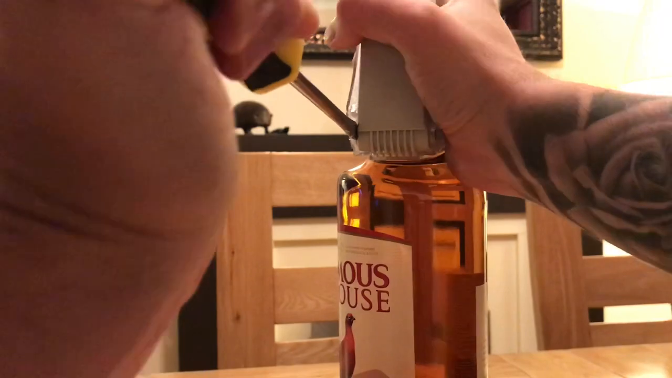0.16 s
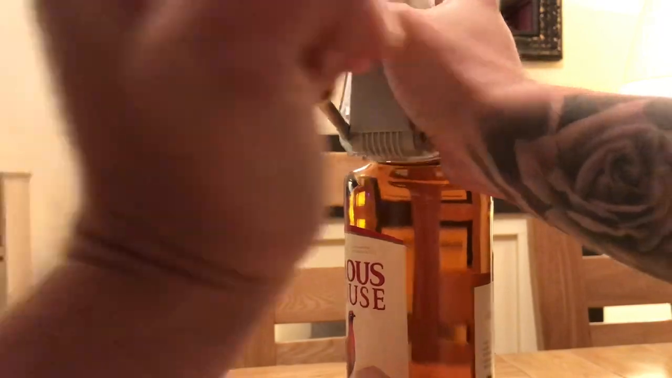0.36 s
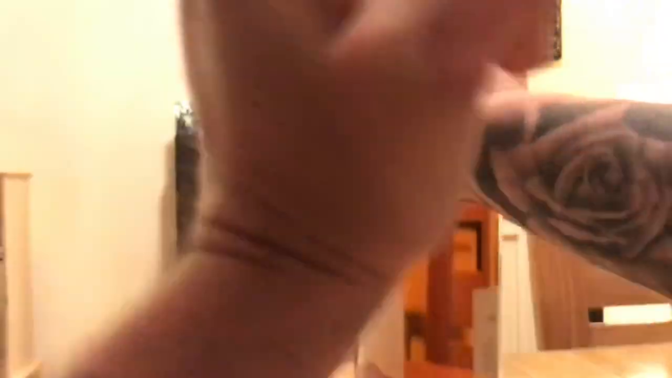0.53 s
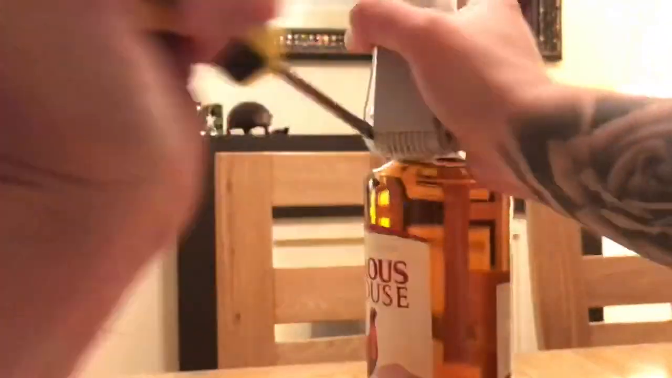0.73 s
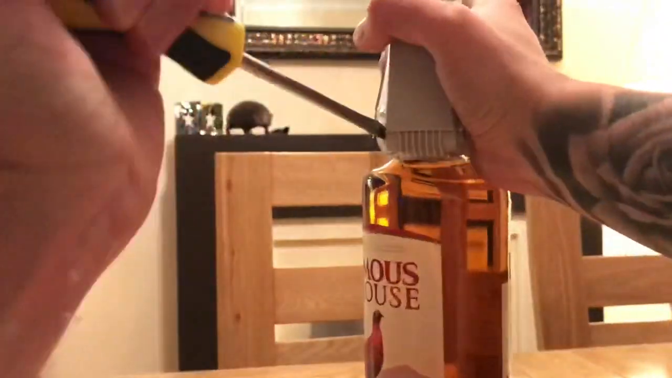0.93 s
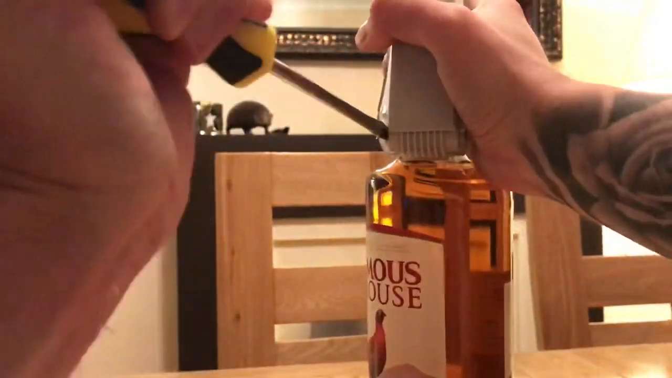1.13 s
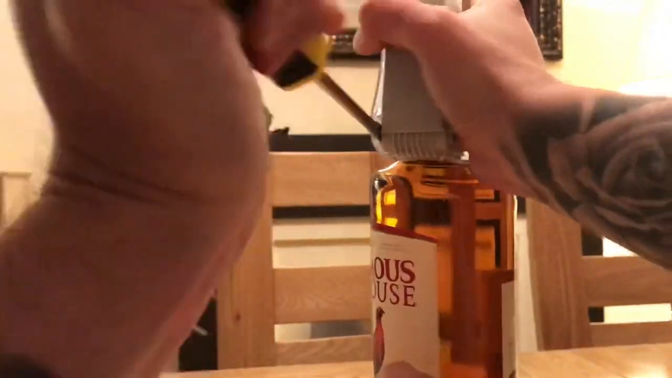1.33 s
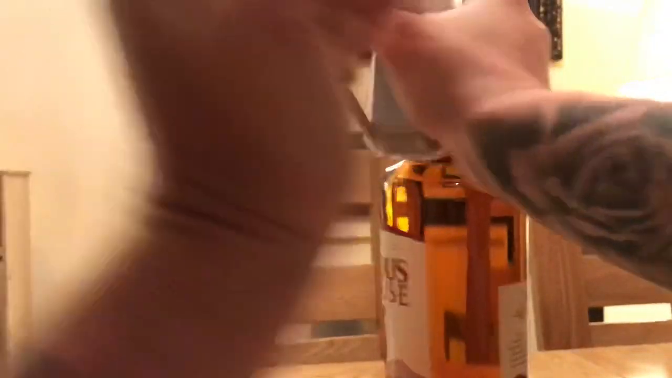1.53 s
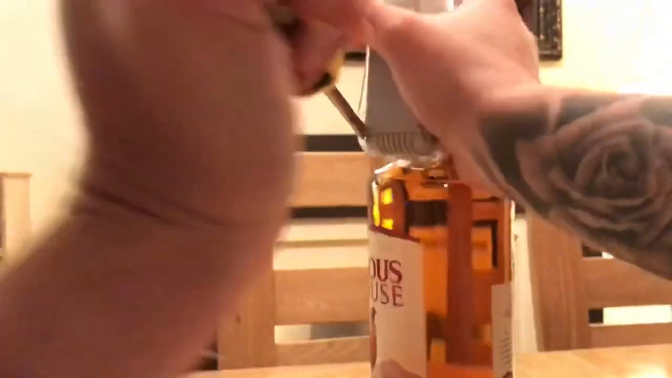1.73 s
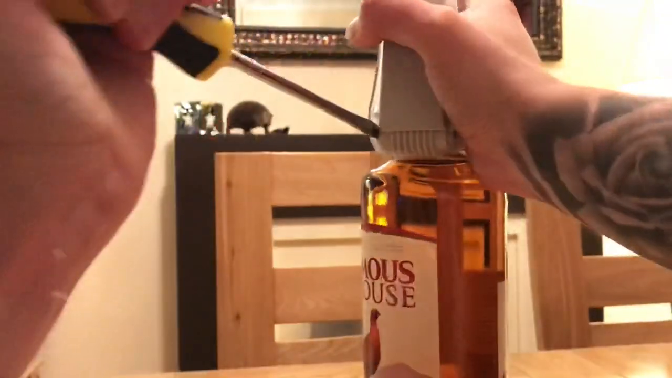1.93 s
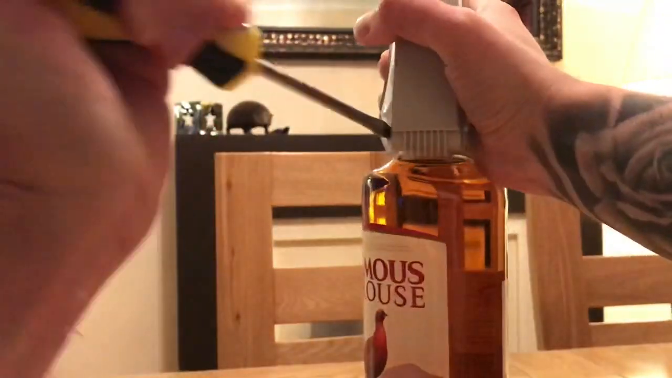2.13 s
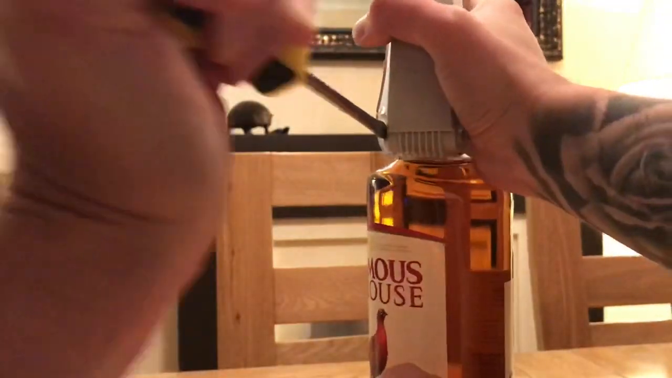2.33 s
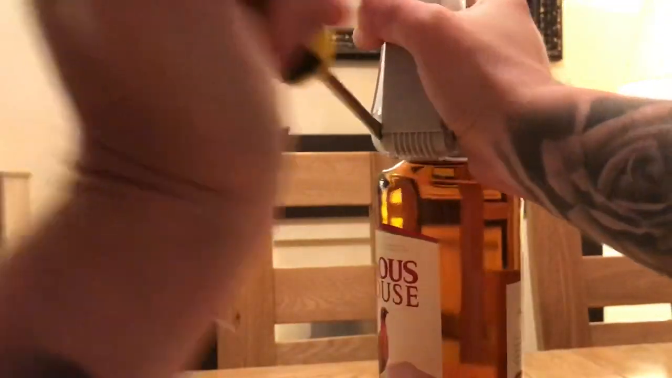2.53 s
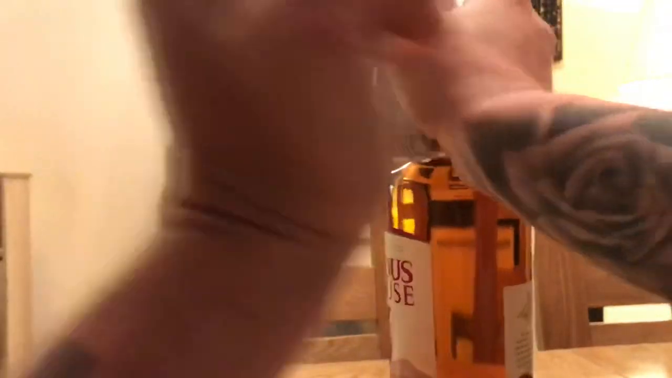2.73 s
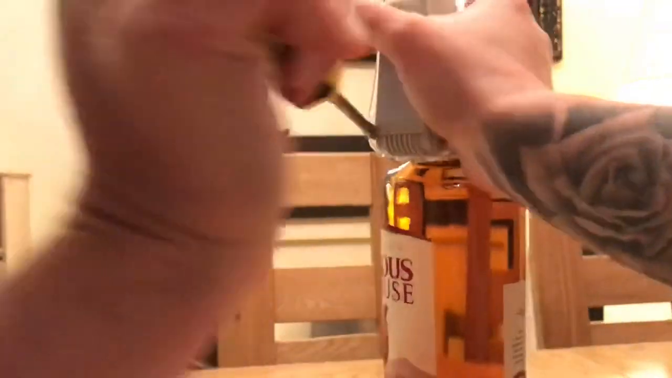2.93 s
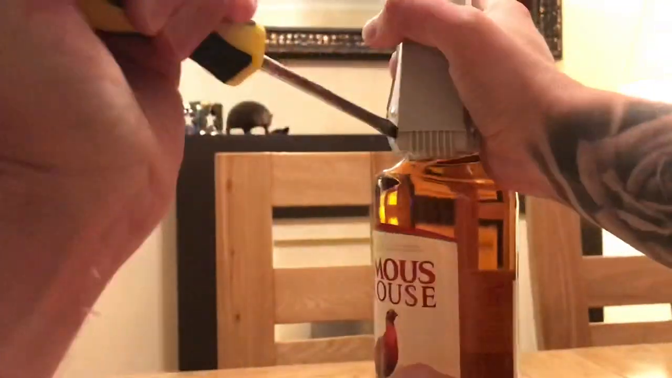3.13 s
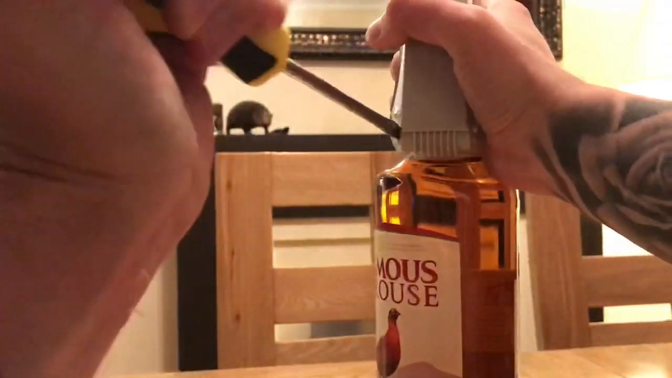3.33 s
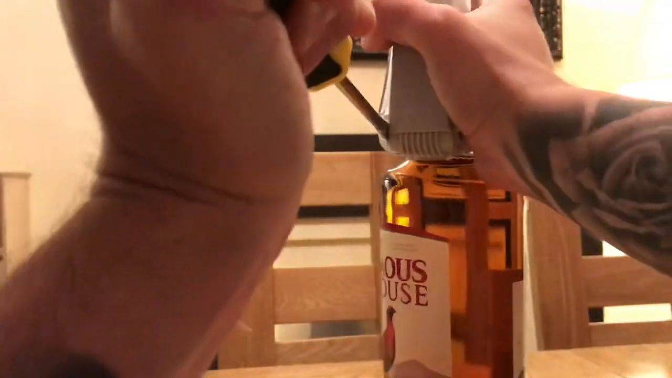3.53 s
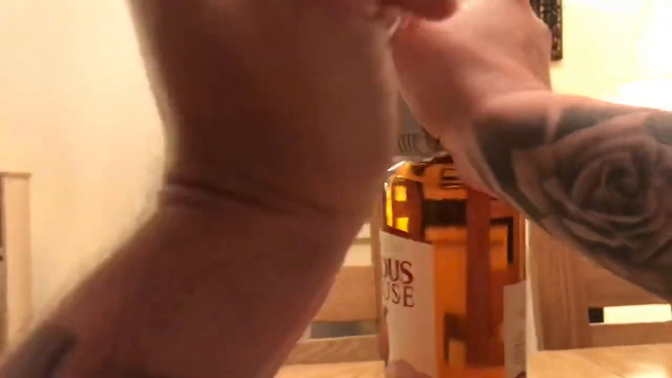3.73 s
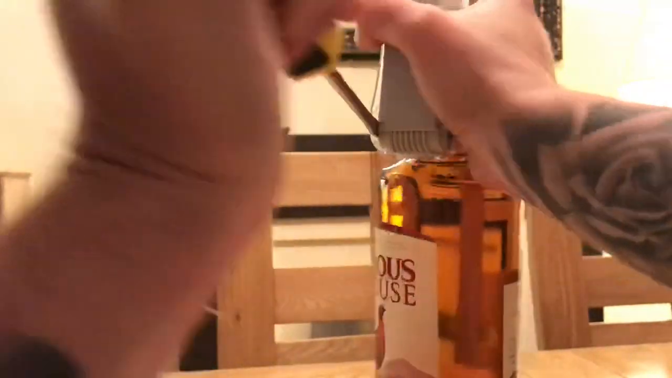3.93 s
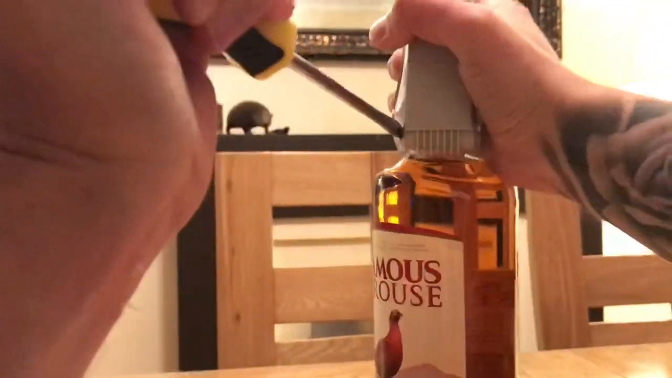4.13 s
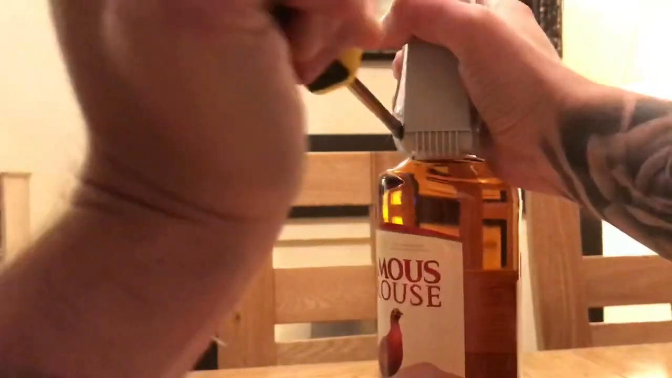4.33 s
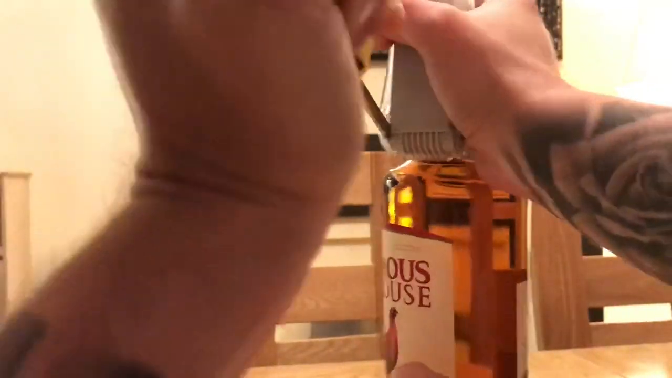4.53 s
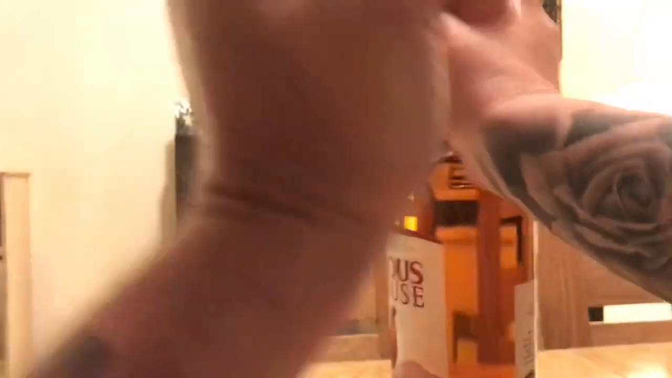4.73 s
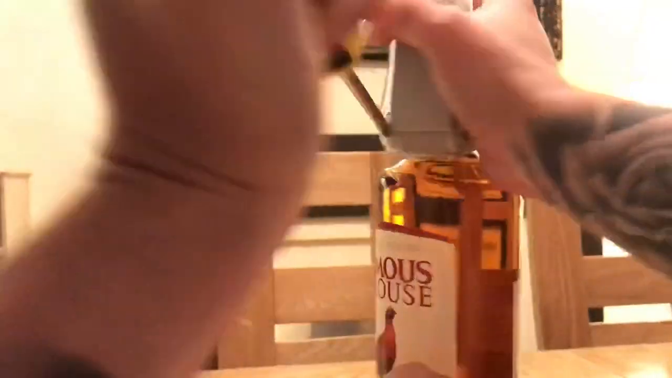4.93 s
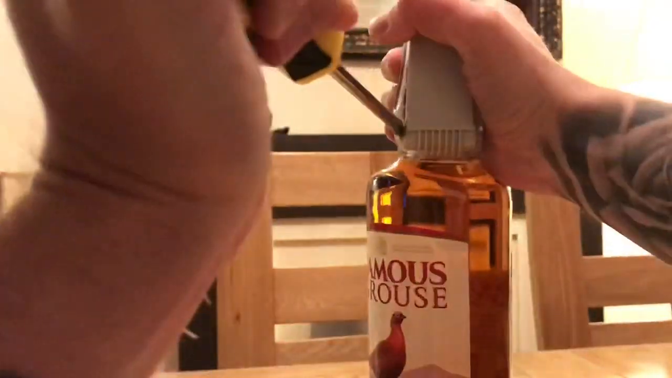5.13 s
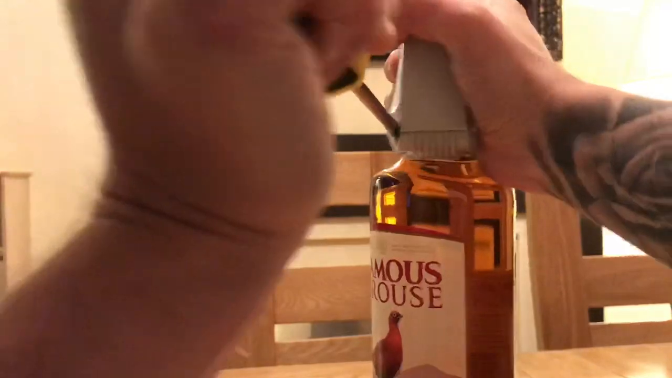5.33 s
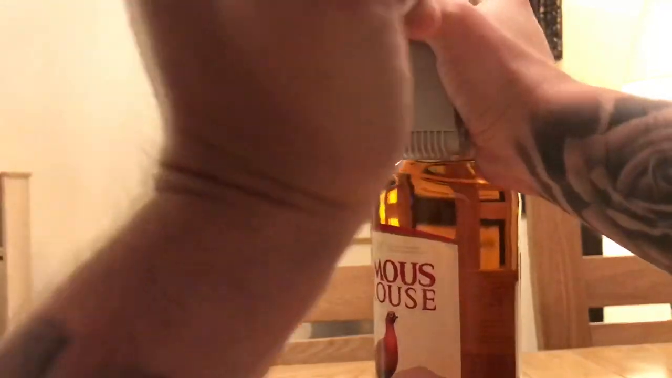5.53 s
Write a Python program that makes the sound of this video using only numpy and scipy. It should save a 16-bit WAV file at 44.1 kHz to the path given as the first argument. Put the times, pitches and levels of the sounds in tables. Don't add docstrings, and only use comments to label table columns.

```python
import sys
import numpy as np
from scipy import signal
from scipy.fft import rfft, irfft
from scipy.io import wavfile
from scipy.ndimage import uniform_filter1d

SR = 44100
rng = np.random.default_rng(int(sys.argv[2]) if len(sys.argv) > 2 else 0)


def linear_from_db(decibels):
    return 10 ** (np.asarray(decibels, float) / 20)


def unload_audio(sound):
    columns = np.transpose(np.atleast_2d(sound))
    steps = np.round(np.clip(columns, -1, 1) * 32767)
    wavfile.write(sys.argv[1], SR, steps.astype(np.int16))


N = 250047

# (frequency [Hz], level [dB])
FLOOR_SPECTRUM = [(25, -25), (120, -3), (212, -12.5), (309, -10), (624, -22), (2000, -29), (10400, -40.5),
                  (15500, -37.5)]
# (frequency [Hz], time to fall 60 dB [s])
ROOM_T60 = [(150, 0.85), (500, 0.35), (1500, 0.31), (4000, 0.31), (8000, .28), (14000, 0.19)]
# (frequency [Hz], level [dB])
ROOM_COLOUR = [(100, -15), (400, 10), (900, -1), (2100, -2.5), (3200, -2.5), (6000, -3), (10000, -4),
               (16000, -3.5)]

TABLE_LOW_MODES = [(73.5, -20, 0.11), (117, -1.5, 0.06), (124.04, 5.5, 0.25), (150.8, 2.5, 0.17),
                   (181.2, -0.5, 0.23), (212.2, -1.5, .25)]
TABLE_UPPER_MODES = [(278.4, 2.2, 0.19), (319.2, 3.5, .17), (369.3, 5.5, 0.074), (392.5, 2, 0.088),
                     (487.6, 1.5, 0.21), (516, -6, 0.6), (601, 1.5, 0.14), (633, -5.5, 0.38),
                     (699, -3.5, 0.5), (972, -3, 0.18)]
GRAIN_MODES = [(554, -0.5, 0.11), (625, 0, 0.1), (706, -4.5, .07), (697.3, -5.5, 0.23), (920, -3.5, 0.035),
               (1098, -5.5, .035), (1300, -2.5, 0.025), (1900, -15, 0.012)]
BOTTLE_MODES = [(1232, -55.5, 1.1), (1303, -56.5, 0.68)]
STRAIN_MODES = [(623, 8, 0.06), (790, 14.5, 0.054), (1250, -0.5, 0.024), (2300, -11, 0.023)]
SHELL_MODES = [(1340, -19, 0.011), (1330, -4, 0.01), (1650, 1.5, 0.023), (1704, -9, 0.078)]
MIDDLE_MODES = [(2592, -29, 0.056), (2713, 7, 0.0076), (3221, -1.5, 0.042), (3270, 5, 0.017),
                (3500, 0.5, 0.0091), (4050, -15, 0.02), (4400, -2, 0.022), (5070, -16, 0.013)]
THIN_MODES = [(6300, 11.5, 0.013), (6720, 3, .011), (7590, 0, 0.039), (8130, 4.5, 0.0052),
              (10200, -10, 0.0038), (11600, -16, 0.0044), (11900, -9, 0.0017), (13800, 5, .005)]

# (time [s], pressure [dB])
HANDLING = [(0.0, -57.5), (0.85, -46.5), (0.95, -68.5), (1.3, -55.5), (1.53, -51.5), (1.66, -39),
            (2.0, -61), (2.18, -54.5), (2.7, -61.5), (2.87, -54), (3.4, -72.5), (4.14, -47.5), (4.5, -50.5),
            (4.91, -49), (5.43, -64.5), (5.67, -60)]
# (time [s], level [dB], frequency [Hz], time to fall 60 dB [s])
THUMPS = [
    (0.452, -30, 67, 0.22),
    (1.472, -51.5, 45, .15),
    (2.652, -35.5, 48.7, 0.13),
    (3.61, -39, 44.8, 0.2),
    (4.616, -39, 45, 0.2),
]
# (time [s], level [dB])
JOLTS = [
    (0.297, -32.5),
    (1.471, -15.5),
    (2.655, -16),
    (3.608, -17),
    (4.612, -15.5),
]
# (time [s], upper modes [dB], low modes [dB], grain rattle [dB])
LANDINGS = [(.171, -32, -33.5, -55), (.633, -7.5, -7, -15.5), (.934, -26, -22, -43),
            (1.681, -14, -10.5, -28.5), (1.728, -31.5, -54, -57), (1.773, -29, -42.5, -40.5),
            (2.875, -16, -12.5, -27.5), (2.918, -19.5, -16.5, -35), (3.04, -29.5, -26, -45.5),
            (3.059, -42.5, -59, -51.5), (3.161, -36, -42.5, -46), (3.999, -24, -26.5, -42.5),
            (4.014, -34, -26, -51), (4.046, -23, -18, -35.5), (4.157, -58.5, -53, -52.5),
            (4.925, -35.5, -26, -34), (4.975, -24, -23.5, -46), (5.066, -35, -23, -43.5)]
# (time [s], upper modes [dB], low modes [dB])
ROCKS = [(0.418, -37.5, -42), (.447, -52, -33.5), (0.595, -34.5, -46), (0.96, -45, -32.5),
         (1.138, -36.5, -52), (1.229, -42, -33), (1.318, -57.5, -42.5), (1.97, -42, -40.5),
         (2.428, -57, -53.5), (2.476, -61.5, -52.5), (3.35, -47, -57), (3.378, -37.5, -30.5),
         (4.298, -40, -44.5), (4.372, -50, -46.5), (4.433, -39, -40), (5.279, -45, -48),
         (5.433, -59.5, -47.5)]

# (time [s], level [dB], tilt [dB per octave], length [ms])
SCRAPES = [
    (0.787, -46, -13, 12.3),
    (1.176, -68, 3, 8.3),
    (4.342, -55, -2, 22),
    (4.398, -49.5, 1.3, 17),
    (5.146, -54, -4.5, 12),
    (5.214, -48.5, -1.5, 28),
    (5.284, -48, 4, 74),
]
# (time [s], level [dB], length [ms])
STRAIN = [
    (1.459, -29, 10.5),
    (2.018, -52, 4.5),
    (2.635, -31.5, 5.4),
    (3.593, -38.5, 2.9),
    (4.596, -38.5, 9.9),
]
# (time [s], middle modes [dB], thin modes [dB], blade pitch [Hz])
RIB_TICKS = [(0.114, -29.5, -42.5, 2785), (.1683, -39.5, -40, 3080), (.612, -51, -52, 3180),
             (1.1858, -35, -43, 3034), (1.6069, -45, -54, 2690), (1.756, -45.5, -54, 3000),
             (2.2421, -57, -60, 2606), (2.346, -46.5, -46, 3000), (2.457, -57, -58, 2510),
             (2.4699, -43, -40.5, 2900), (2.906, -39, -49.5, 4600), (3.0592, -49, -55.5, 3060),
             (3.4595, -33, -31, 3090), (3.4657, -33, -37, 5290), (3.5844, -53.5, -53.5, 2960),
             (3.8673, -58, -58.5, 3220), (4.389, -51.5, -64, 3100), (4.439, -35, -42, 3150),
             (4.8328, -52, -46, 3000), (4.849, -47, -55, 3230), (4.889, -48.5, -60, 4700),
             (4.958, -52, -50.5, 2630), (5.3599, -38, -44, 3120)]
# (time [s], middle modes [dB], shell
# modes [dB], blade pitch [Hz])
SHELL_TAPS = [(0.6345, -38.5, -22, 2760), (.659, -45.5, -47, 3260), (0.7847, -47, -34, 2520),
              (0.9672, -57, -53, 3790), (1.448, -48.5, -42, 2930), (1.6788, -42.5, -30, 2300),
              (1.728, -41.5, -38, 3170), (2.108, -54, -53, 2690), (2.6265, -44, -43, 3440),
              (2.873, -55, -35, 2300), (2.9134, -49, -50.5, 3270), (3.9815, -54, -46, 4250),
              (4.2266, -46.5, -47, 3210), (4.589, -54, -51.5, 4470), (4.875, -46, -51, 3220)]
# (time [s], middle modes [dB], shell modes [dB], blade pitch [Hz])
HELD_TAPS = [(.7336, -58, -64.5, 3140), (.9345, -46.5, -47, 3280), (1.1306, -55.5, -56, 3460),
             (1.42, -69, -58, 4480), (1.8901, -61, -70, 2670), (2.2093, -58, -74, 2800),
             (2.3213, -44.5, -48, 2700), (3.0223, -31, -30.5, 3280), (3.0257, -33, -46, 2640),
             (3.255, -62, -67.5, 3830), (3.3457, -35.5, -47.5, 2720), (3.9018, -46.5, -46.5, 3160),
             (4.0124, -38, -35, 3070), (4.047, -41, -49, 2440), (4.158, -64.5, -68, 3420),
             (4.3698, -37, -45.5, 2720), (4.5022, -53, -57.5, 3270), (4.9273, -28, -34, 3200),
             (4.9751, -50, -40.5, 3500), (5.0641, -53, -54, 2300), (5.198, -57.5, -76, 3130)]
# (time [s], thin modes [dB])
GRAZES = [(.2755, -53.5), (.293, -68), (.5717, -61.5), (1.0689, -59), (1.094, -66), (1.272, -64),
          (1.2992, -61), (1.9649, -61.5), (2.0207, -64.5), (2.072, -64.5), (2.64, -51.5), (3.1518, -60),
          (3.312, -65.5), (3.8574, -59), (3.9144, -53.5), (4.1105, -64.5), (4.5578, -60), (4.601, -55.5)]
# (time [s], middle modes [dB], shell modes [dB], thin modes [dB], slip length [ms])
SNAPS = [
    (0.2982, -13.5, -19.5, -11, 1.52),
    (1.4689, -6.5, -8.5, -13.5, 3.8),
    (2.6504, 0.5, -6, -6.5, 1.2),
    (3.6063, -6.5, -10, -14.5, 3.7),
    (4.6123, -5.5, -10, -11, 2.64),
]

CAP_SPREAD_DB, TABLE_SPREAD_DB = 2.5, 3.0


def at_hz(points, hz):
    points_hz, values = np.transpose(points)
    return np.interp(np.log(hz), np.log(points_hz), values)


def rms_one(x):
    return x / np.sqrt(np.mean(x ** 2) + 1e-20)


def band(x, low_hz, high_hz):
    edges = [low_hz, min(high_hz, .45 * SR)]
    return signal.sosfilt(signal.butter(2, edges, "band", fs=SR, output="sos"), x)


def ring(force, hz, t60):
    r, w = linear_from_db(-60 / (max(t60, .002) * SR)), 2 * np.pi * hz / SR
    return signal.lfilter([0, np.sin(w)], [1, -2 * r * np.cos(w), r * r], force + 1e-18)


def strike(times, pulses, dbs, modes, spread_db, crack_db=-60, sign=-1):
    out = np.zeros((2, N + SR))
    luck = rng.standard_normal((len(times), len(modes)))
    hz, mode_db, t60 = np.transpose(modes)
    t = np.arange(round(1.2 * t60.max() * SR))[:, None] / SR
    fade = linear_from_db(-60 * t / np.maximum(t60, .002))
    rings = fade * np.sin(2 * np.pi * hz * t) * sign ** np.arange(len(hz))
    click = (t[:, 0] == 0).astype(float)
    crack = band(click, 0.76 * hz.min(), 1.044 * hz.max()) * SR / hz.mean()
    window = round(SR / hz.min()) + 200
    for s, pulse, db, chance in zip(times, pulses, dbs, luck):
        body = rings @ linear_from_db(mode_db + spread_db * chance) + linear_from_db(crack_db) * crack
        sound = signal.fftconvolve(pulse, body)
        loudest = np.sqrt(uniform_filter1d(sound ** 2, size=window).max())
        sound = linear_from_db(db) * sound / loudest
        same_energy = np.sqrt(np.sum(sound ** 2) / np.sum(crack ** 2))
        start = round(s * SR)
        out[0, start:][:len(sound)] += sound
        out[1, start:][:len(crack)] += crack * same_energy
    return out[:, :N]


def crackle(lengths_s, fading, grain_db):
    t = np.arange(SR // 10) / SR
    size = (len(lengths_s), len(t))
    grains = rng.standard_normal(size) * linear_from_db(grain_db * rng.exponential(1, size))
    span = np.maximum(np.array(lengths_s), 1e-4)[:, None]
    if fading:
        shape = np.exp(-t / span)
    else:
        shape = np.clip(np.minimum(t, span - t) / .002, 0, 1) * linear_from_db(-4 * t / span)
    return [g / np.sqrt(np.sum(g ** 2)) for g in grains * shape]


def floor():
    hz = np.maximum(np.fft.rfftfreq(N, 1 / SR), 1)
    spectrum = rfft(rng.standard_normal(N)) * linear_from_db(at_hz(FLOOR_SPECTRUM, hz))
    return linear_from_db(-59) * rms_one(irfft(spectrum, N))


def room(x, gap_s, build_s):
    t, tail = np.arange(SR // 2) / SR, 0
    edges = 60 * 2 ** np.arange(0, 8.4, .5)
    for low, high in zip(edges, edges[1:]):
        noise = band(rng.standard_normal(len(t)), low, high)
        hz = np.sqrt(low * high)
        tail = tail + noise * linear_from_db(at_hz(ROOM_COLOUR, hz) - 60 * t / at_hz(ROOM_T60, hz))
    build = 1 - np.exp(-np.maximum(t - gap_s, 0) / build_s)
    return signal.fftconvolve(x, tail * build / np.sqrt(SR))[:N]


def handling():
    wobble_db, settle_db_per_s = -28, 119
    pressure = linear_from_db(np.interp(np.arange(N) / SR, *np.transpose(HANDLING)))
    land_s, land_upper, land_low, _ = np.transpose(LANDINGS)
    force = rng.standard_normal(N) * (rng.random(N) < 150 / SR)
    out = 0
    for modes, share_db, land_db in ((TABLE_LOW_MODES, -5, land_low), (TABLE_UPPER_MODES, -11.5, land_upper)):
        kicks = np.zeros(N)
        kicks[(land_s * SR).astype(int)] = linear_from_db(land_db + wobble_db)
        wobble = signal.lfilter([1], [1, -linear_from_db(-settle_db_per_s / SR)], kicks)
        murmur = sum(linear_from_db(db) * ring(force, hz, .5 * t60) for hz, db, t60 in modes)
        murmur = signal.sosfilt(signal.butter(2, 1200, fs=SR, output="sos"), murmur)
        out = out + rms_one(murmur) * (linear_from_db(share_db) * pressure + wobble)
    return out


def thumps():
    samples = np.arange(N)
    return sum(ring(linear_from_db(db) * (samples == round(s * SR)), hz, t60) for s, db, hz, t60 in THUMPS)


def base_contacts():
    jolts = [(s, db, db + 2.6, db + 3, 0.27) for s, db in JOLTS]
    landings = [(*row, 1.3) for row in LANDINGS]
    rocks = [(s, upper, low, (upper + low) / 2 - 14, 1.6) for s, upper, low in ROCKS]
    return sorted(jolts + landings + rocks)


def knocks():
    s, upper, low, grain, ms = np.transpose(base_contacts())
    pushes = [np.sin(np.pi * np.arange(0, 1, 1000 / (max(m, .1) * SR))) for m in ms]
    rattle = crackle(np.full(len(s), .004), True, grain_db=-8.0)
    table = (strike(s, pushes, low - 5, TABLE_LOW_MODES, TABLE_SPREAD_DB, sign=0.94)
             + strike(s, pushes, upper - 4, TABLE_UPPER_MODES, TABLE_SPREAD_DB, sign=0.84)
             + strike(s, rattle, grain - 5, GRAIN_MODES, TABLE_SPREAD_DB, crack_db=3))
    return signal.sosfilt(signal.butter(4, 80, "high", fs=SR, output="sos"), table)


def bottle():
    jolts = np.zeros(N)
    starts = [round(row[0] * SR) for row in SNAPS]
    jolts[starts] = linear_from_db(np.array(SNAPS)[:, 2] + 10)
    return sum(linear_from_db(db) * ring(jolts, hz, t60) for hz, db, t60 in BOTTLE_MODES)


def touches():
    ticks = [(s, mid, mid - 15, thin, 2.4, hz) for s, mid, thin, hz in RIB_TICKS]
    taps = [(s, mid, shell, mid - 7, 1.6, hz) for s, mid, shell, hz in SHELL_TAPS]
    held = [(s, mid, shell, mid - 20, 2.3, hz) for s, mid, shell, hz in HELD_TAPS]
    grazes = [(s, db - 8.5, db - 10.5, db, 1.3, 3150) for s, db in GRAZES]
    return sorted(ticks + taps + held + grazes)


def blade(ping_db, t60, rise_s):
    out, t = np.zeros(N + SR), np.arange(SR // 10) / SR
    for s, db, _, thin_db, _, hz in touches():
        swell = (1 - np.exp(-t / rise_s)) * linear_from_db(db + ping_db - 60 * t / t60)
        overtone_hz = min(4 * hz, .45 * SR)
        overtone = linear_from_db(-7.5 + min(thin_db - db, 0)) * np.sin(2 * np.pi * overtone_hz * t)
        out[round(s * SR):][:len(t)] += swell * (np.sin(2 * np.pi * hz * t) + overtone)
    return out[:N]


def scrapes():
    ridges_per_s, depth = 280, 0.38
    s, db, tilt, ms = np.transpose(SCRAPES)
    drags = crackle(ms / 1000, False, grain_db=1.5)
    uneven = 1 + 2 * uniform_filter1d(rng.standard_normal(SR // 10), size=100)
    ridge = np.cumsum(ridges_per_s / SR * uneven)
    skips = 1 - depth + depth * 3 * np.exp(-4 * (ridge % 1))
    drags = [d * skips for d in drags]
    return (strike(s, drags, db + 1.38 * tilt, THIN_MODES, CAP_SPREAD_DB, crack_db=17.0)
            - strike(s, drags, db, MIDDLE_MODES, CAP_SPREAD_DB, crack_db=4))


def strain():
    s, db, ms = np.transpose(STRAIN)
    creaks = crackle(ms / 1000, False, grain_db=2.5)
    return strike(s, creaks, db + 2.0, STRAIN_MODES, CAP_SPREAD_DB, crack_db=-1.5)


def cap(contacts, shell_db, middle_db, thin_db, crack_db):
    s, middle, shell, thin, ms = np.transpose(contacts)[:5]
    slips = crackle(ms / 1000, True, grain_db=3.0)
    return (strike(s, slips, shell + shell_db, SHELL_MODES, CAP_SPREAD_DB, crack_db - 13.5)
            - strike(s, slips, middle + middle_db, MIDDLE_MODES, CAP_SPREAD_DB, crack_db)
            + strike(s, slips, thin + thin_db, THIN_MODES, CAP_SPREAD_DB, crack_db + 14.0))


def scene():
    table = knocks()
    pings = blade(ping_db=7.5, t60=.015, rise_s=0.00031)
    ticks = cap(touches(), shell_db=-3, middle_db=-7.0, thin_db=1, crack_db=5.0) + strain() + scrapes()
    snaps = cap(SNAPS, shell_db=-5.0, middle_db=-5, thin_db=-0.5, crack_db=5.5)
    around = linear_from_db(11.5) * snaps + linear_from_db(10.5) * ticks
    sent = .3 * around[0] + 0.6 * around[1] + linear_from_db(2.5) * pings
    sent = sent + linear_from_db(2.0) * table[0] + linear_from_db(2.5) * table[1]
    wet = room(sent, gap_s=.002, build_s=0.001)
    near = (snaps + ticks + table)[0] + pings + bottle() + thumps() + handling()
    return (near + wet + linear_from_db(1.0) * floor())[None]


def low_pass(x):
    return signal.sosfilt(signal.butter(12, 17070, fs=SR, output="sos"), x)


def record(dry):
    limit, top_hz = .76, 16400
    x = signal.sosfilt(signal.butter(2, 45, "high", fs=SR, output="sos"), dry)
    x = limit * np.tanh(x / limit)
    x = signal.sosfilt(signal.cheby2(14, 55, top_hz, fs=SR, output="sos"), x)
    return low_pass(x)


dry = scene()
out = record(dry)
unload_audio(out)
```